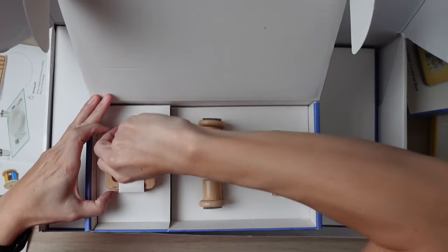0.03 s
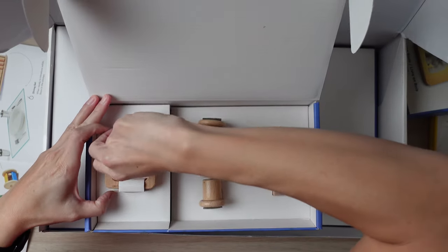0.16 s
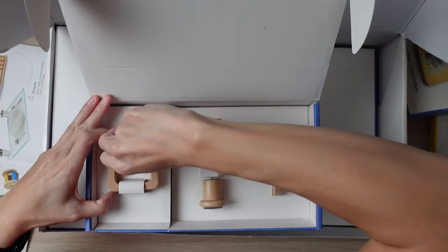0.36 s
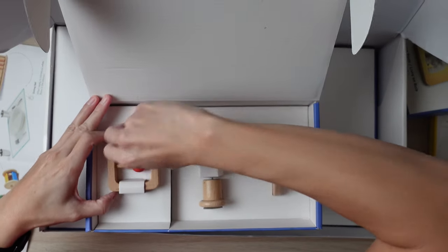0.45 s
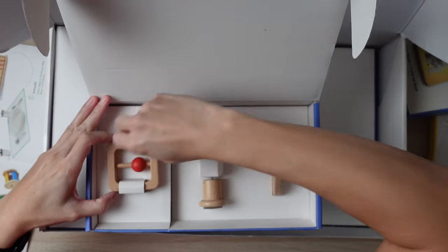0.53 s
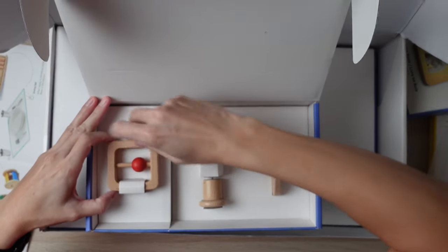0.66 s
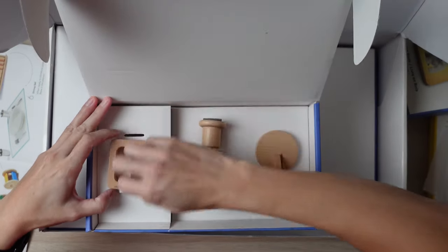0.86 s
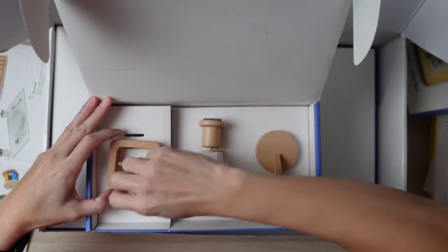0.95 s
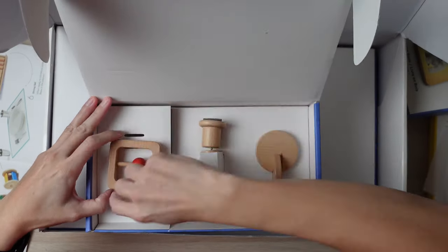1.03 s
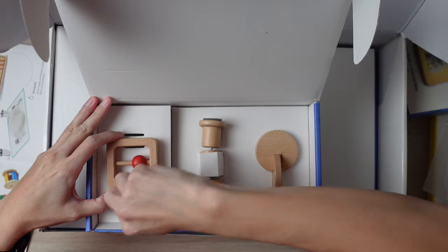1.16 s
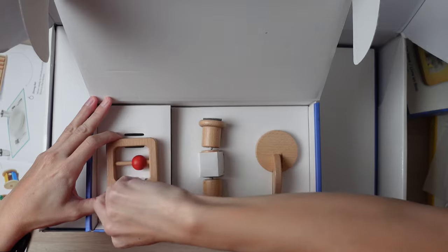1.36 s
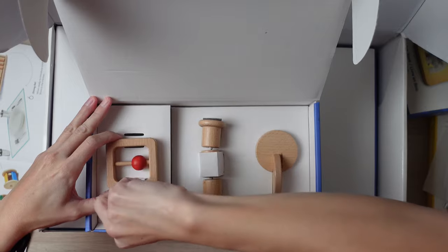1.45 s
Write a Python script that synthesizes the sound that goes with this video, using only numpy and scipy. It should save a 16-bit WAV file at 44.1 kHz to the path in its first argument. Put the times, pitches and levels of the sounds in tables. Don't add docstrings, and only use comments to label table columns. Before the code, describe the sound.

Wood-on-card clatter as a small toy jerks loose in its box, followed by light knocks and finger rustle

```python
import sys
import numpy as np
from scipy import signal
from scipy.fft import rfft, irfft
from scipy.io import wavfile

SR = 44100
rng = np.random.default_rng(int(sys.argv[2]) if len(sys.argv) > 2 else 0)


def output_pcm(signal):
    pcm = np.clip(np.atleast_2d(signal).T, -1, 1) * 32767
    wavfile.write(sys.argv[1], SR, np.round(pcm).astype(np.int16))


def ratio(d):
    e = np.asarray(d, float) / 20
    return 10 ** e


N = 66150

# f/Hz, density/dB
FLOOR_COLOUR = [(50, -38), (90, 0), (220, -17.5), (800, -28.5), (2100, -21), (4000, -15.5), (9000, -29.5),
                (16000, -31)]
# f/Hz, level/dB, t60/s
TABLE_MODES = [
    (29.9, 3, 0.73),
    (39, -12.5, 0.23),
    (54, 1, 0.57),
    (88, -36.5, .1),
]
# t/s, level/dB, contact/ms
SHOVES = [
    (0.263, -18.5, 7.1),
    (0.287, -14.5, 4.1),
    (0.303, -18.5, 11.5),
    (0.346, -20.5, 11.2),
]
# t/s, level/dB
HAND_LEVEL = [(0, -42.5), (.12, -35), (.2, -42.5), (.31, -21), (.45, -41), (.56, -43.5), (.63, -35),
              (.69, -43), (.74, -34), (.8, -44.5), (.86, -40), (.91, -48.5), (1.1, -49.5), (1.22, -37.5),
              (1.3, -47.5), (1.5, -40.5)]
# t/s, level/dB
CREAK_LEVEL = [(0, -44.5), (.15, -47.5), (.47, -48.5), (.56, -46.5), (.65, -58), (.76, -45.5), (.84, -59.5),
               (1.08, -63), (1.17, -50.5), (1.33, -52), (1.41, -53), (1.5, -47.5)]
# f/Hz, density/dB
CREAK_COLOUR = [(59, -25), (100, -5.5), (193, -15), (1190, -17.5), (2060, -28.5), (4130, -31.5),
                (8000, -78), (10400, -54), (17600, -120)]
# t/s, length/s, level/dB, hollow f/Hz, brightness/dB
RUBS = [(0, 0.0052, -40.5, 5480, -9), (0.385, 0.078, -50, 7700, -6), (0.488, 0.031, -51.5, 4840, 1),
        (0.545, 0.047, -47.5, 8700, 3), (0.586, 0.061, -51.5, 7500, 7), (0.65, 0.087, -45, 8100, 6.5),
        (0.716, 0.015, -41, 5330, -3), (0.723, 0.062, -48.5, 5400, -2), (0.774, 0.11, -52.5, 8150, -20),
        (0.827, 0.081, -47.5, 6480, 5), (0.903, 0.13, -44.5, 5040, 4.5), (0.97, 0.023, -35, 5580, 1),
        (1.042, 0.054, -65, 3390, 1.5), (1.074, 0.18, -57.5, 4600, -11), (0.96, 0.033, -40, 2600, -8.5),
        (0.999, 0.02, -57, 5200, 8.5), (1.03, 0.055, -50, 2400, -1), (1.104, 0.0083, -63, 12000, 17),
        (1.2, 0.0048, -67, 10200, 23), (1.358, 0.0038, -60, 7530, 11), (1.363, 0.0064, -48, 7560, -13),
        (1.465, 0.015, -56, 4250, 4), (1.24, 0.093, -78.5, 3900, -15)]
# f/Hz, density/dB
RUB_COLOUR = [(1200, -32.5), (2800, -22.5), (3300, -22.5), (5600, -1), (9000, -16), (13000, -25.5),
              (16000, -7.5)]
# f/Hz, width/Hz, level/dB
RUB_PEAKS = [(3540, 590, -6.5), (4730, 2000, -8.5), (13240, 480, -15)]
# t/s, level/dB
RASP_LEVEL = [(.155, -57), (.18, -29.5), (.205, -37.5), (.225, -20), (.27, -16), (.3, -31.5), (.35, -36),
              (.42, -57), (.5, -76)]
# f/Hz, density/dB
RASP_COLOUR = [(100, -10), (330, -2.5), (650, -0.5), (1000, -2.5), (1600, 0), (4000, -10), (8700, -25.5),
               (16000, -38)]
# f/Hz, level/dB, t60/s
BOX_MODES = [(142.4, 0.5, 0.11), (181, -2, 0.039), (322, -10, 0.059), (373, -6, 0.094), (592, 4, 0.039),
             (701, 0, 0.051), (900.3, -3.5, 0.067), (1133, 9.5, 0.015), (1302, -2, 0.041), (1590, 3, 0.022),
             (1922, -0.5, 0.039), (2500, 2.5, 0.0045), (3290, -1, 0.038), (4660, -6, 0.01)]
# t/s, peak/dB, ring centre f/Hz,
# crack/dB, contact/ms
TAPS = [(.018, -35.5, 1590, -7.5, 0.33), (.066, -28, 550, -4, 0.88), (.111, -27.5, 1710, -14, 3.2),
        (.119, -37, 1000, -5, 0.74), (.321, -24.5, 574, -20, 0.6), (.329, -25.5, 944, -11, 0.89),
        (.345, -35.5, 1390, -17, 1.5), (.355, -18, 1594, -18, .6), (.36, -21.5, 1026, -7.5, 0.81),
        (.364, -18, 543, -23.5, 0.61), (.373, -42, 910, -24, 0.4), (.381, -32, 630, -28, 3.2),
        (.4025, -27, 1070, -8, 0.22), (.407, -29.5, 430, -15, 1.2), (.5152, -14.5, 1122, -17.5, 0.4),
        (.519, -28.5, 442, -11.5, 2.8), (.528, -47, 915, -12, 4.2), (.5968, -25.5, 860, -30, 0.1),
        (.6, -28, 369, -35, 0.71), (.6035, -34.5, 620, -28, 1.2), (.693, -35, 640, -18, 0.18),
        (.72, -30, 3530, -11, 0.73), (.771, -35, 947, -8, 10.7), (1.1205, -20, 933, -15, 0.79),
        (1.123, -24, 378, -40, 3.7), (1.139, -30, 857, -19, 4.2), (1.301, -39.5, 426, -33, 17),
        (1.308, -40, 1120, -17, 1.6), (1.3548, -38.5, 2500, -17.5, 0.67), (1.3565, -40, 3870, -2.5, 0.76),
        (1.434, -42, 815, -11.5, 6.3), (.4685, -37, 600, -11, 0.73), (.481, -45, 833, -29, 1.2),
        (1.1208, -34.5, 1984, 4, 0.13), (1.143, -32.5, 1470, -7.5, 1.9), (.5972, -30.5, 1390, -10, 0.16),
        (.366, -22.5, 376.5, -24, 2.7), (.268, -21, 162, -38, 3.6), (.362, -32.5, 151, -40, 3.8),
        (1.151, -41, 1040, -10, 4.6)]
# f/Hz, density/dB
TAP_CRACK_COLOUR = [(400, -26.5), (900, -7.5), (1700, 1.5), (3000, -0.5), (5000, -8.5), (9000, -21),
                    (16000, -41.5)]
# t/s, peak/dB, ring centre f/Hz, crack/dB, contact/ms
CLACKS = [(.168, -23.5, 2060, -12.5, 3.4), (.173, -16.5, 1054, -14.5, 1.1), (.181, -24, 990, -22.5, 1.2),
          (.1905, -14.5, 1690, -27.5, 1), (.2, -24.5, 2050, -18, 1.4), (.2104, -15, 1500, -14.5, 1.4),
          (.2128, 1.7, 1026, -15.5, 2.14), (.2145, -12, 666, -38, 1.3), (.219, -7, 1030, -31.5, 0.41),
          (.223, -24, 945, -33, 1.4), (.228, -19.5, 1960, -11.5, 1.1), (.232, -7.5, 1565, -35.5, 0.78),
          (.2360, -2.5, 1490, -5.5, 0.3), (.239, -15, 1085, -2.5, 0.45), (.2443, -16, 2030, -5.5, 0.11),
          (.2487, -9.5, 1114, -37.5, 0.11), (.2550, -8, 890, -21, 0.13), (.259, -18, 1590, -1, 1.8),
          (.2659, -7, 1070, -6, 0.18), (.271, -20, 1260, -14, 1.6), (.2753, -9.5, 1020, -29, 0.54),
          (.2785, -12, 720, -31, 0.2), (.285, -26, 2820, -9, 1.1), (.291, -25.5, 1110, -13, 1.3),
          (.301, -20.5, 840, -22, 1.4), (.307, -28, 1246, -22, 0.65)]
# f/Hz, density/dB
CLACK_CRACK_COLOUR = [(700, -29.5), (1500, -9), (2500, -4.5), (4900, -3.5), (6800, -12.5), (8700, -8.5),
                      (10500, -21.5), (16000, -27)]

FLOOR_DB = -61
ROOM_T60_S, ROOM_DB, ROOM_CUT_HZ = 0.16, -19, 5000
RUB_EDGE_S, RUB_GRAINS_PER_S, RUB_ROUGH_DB, RUB_FLICKER_DB = 0.025, 5200, 1.6, 0.5
HOLLOW_DB, HOLLOW_CYCLES = -6, 20
RASP_SLIPS_PER_S, RASP_ROUGH_DB = 2900, 1.9
RING_OCTAVES, RING_SPREAD_DB, RING_DB = 0.82, 8, -11.5
CRACK_T60_S, CRACK_DB = 0.017, -2
JUDDER_PER_MS, BODY_CUT_HZ = 0.99, 140


def rms_one(x):
    return x / np.sqrt(np.mean(x ** 2) + 1e-20)


def in_time(rows):
    s, *columns = np.transpose(rows)
    return [np.interp(np.arange(N) / SR, s, c) for c in columns]


def colour(x, points):
    hz, db = np.transpose(points)
    grid_hz = np.arange(1025) * SR / 2048
    log_gain = np.interp(np.log(grid_hz + 1), np.log(hz), db / 20 * np.log(10))
    cepstrum = irfft(log_gain)
    cepstrum[1:1024] *= 2
    cepstrum[1025:] = 0
    impulse = irfft(np.exp(rfft(cepstrum)))[:1024]
    return signal.fftconvolve(x, impulse)[:len(x)]


def drift(rate_hz):
    r = np.exp(-2 * np.pi * rate_hz / SR)
    wander = signal.lfilter([1], [1, -2 * r, r * r], rng.standard_normal(N + 9000))
    return rms_one(wander[9000:])


def ring(x, hz, t60_s):
    r, w = ratio(-60 / (t60_s * SR)), 2 * np.pi * hz / SR
    return signal.lfilter([0, np.sin(w)], [1, -2 * r * np.cos(w), r * r], x + 1e-18)


def grains(per_s, rough_db):
    clicks = rng.random(N) < per_s / SR
    size = ratio(rough_db * np.minimum(rng.exponential(1, N), 4))
    return rms_one(clicks * size * rng.choice([-1, 1], N))


def floor():
    return ratio(FLOOR_DB) * rms_one(colour(rng.standard_normal(N), FLOOR_COLOUR))


def room(x):
    t = np.arange(SR // 2) / SR
    tail = rng.standard_normal(len(t)) * ratio(-60 * t / ROOM_T60_S) * np.clip(t / 0.0011, 0, 1)
    tail = signal.sosfilt(signal.butter(1, ROOM_CUT_HZ, fs=SR, output="sos"), tail)
    return signal.fftconvolve(x, tail / np.sqrt(np.sum(tail ** 2)))[:N]


def table():
    force, t = np.zeros(N), np.arange(N) / SR
    for s, db, contact_ms in SHOVES:
        push = np.clip(1 - ((t - s) * 1000 / contact_ms - 1) ** 2, 0, 1) ** 2
        force += ratio(db) * push / push.sum()
    wobble = sum(ratio(db) * ring(force, hz, t60_s) for hz, db, t60_s in TABLE_MODES)
    hands_db, = in_time(HAND_LEVEL)
    noise = rng.standard_normal((2, N + SR))
    upper = rms_one(ring(ring(noise[0], 71.0, 0.11), 55.8, 0.17)[SR:])
    lower = rms_one(ring(ring(noise[1], 26, 0.15), 33, 0.34)[SR:])
    return wobble + ratio(hands_db) * (upper + ratio(-3.5) * lower)


def card_creak():
    creak = rms_one(colour(grains(3000, 1.2), CREAK_COLOUR))
    return ratio(in_time(CREAK_LEVEL)[0] + 2.0 * drift(21)) * creak


def finger_rubs():
    hiss = rms_one(colour(grains(RUB_GRAINS_PER_S, RUB_ROUGH_DB), RUB_COLOUR))
    peaks = sum(ratio(db) * rms_one(ring(hiss, hz, 2.2 / width_hz)) for hz, width_hz, db in RUB_PEAKS)
    hiss = rms_one(hiss + peaks)
    low = signal.sosfilt(signal.butter(4, 9000, "low", fs=SR, output="sos"), hiss)
    high = signal.sosfilt(signal.butter(4, 9000, "high", fs=SR, output="sos"), hiss)
    t, out = np.arange(N) / SR, 0
    for s, length_s, db, hz, bright_db in RUBS:
        to_edge_s = np.minimum(t - s, s + length_s - t)
        stroke = np.clip(to_edge_s / min(RUB_EDGE_S, length_s / 2), 0, 1)
        hollow = ratio(HOLLOW_DB) * rms_one(ring(hiss, hz, HOLLOW_CYCLES / hz))
        out = out + stroke * ratio(db) * (low + ratio(bright_db) * high + hollow)
    return out * ratio(RUB_FLICKER_DB * (drift(46.3) + drift(14.0)))


def rasp():
    slips = rms_one(colour(grains(RASP_SLIPS_PER_S, RASP_ROUGH_DB), RASP_COLOUR))
    rung = rms_one(sum(ring(slips, hz, 0.34 * t60_s) * ratio(db) / np.sqrt(t60_s)
                       for hz, db, t60_s in BOX_MODES))
    t = np.arange(N) / SR
    fade_in = np.clip((t - RASP_LEVEL[0][0]) / 0.013, 0, 1)
    fade_out = np.clip((RASP_LEVEL[-1][0] - t) / 0.071, 0, 1)
    level = ratio(in_time(RASP_LEVEL)[0] + 2.0 * drift(52))
    return level * fade_in * fade_out * rms_one(slips + 0.2 * rung)


def knocks(rows, crack_colour, cycles):
    body, crack, t = np.zeros(N + SR), np.zeros(N + SR), np.arange(6000) / SR
    hz, mode_db, t60_s = np.transpose(BOX_MODES)[:, :, None]
    sign = (-1) ** np.arange(len(hz))[:, None]
    for s, db, centre_hz, crack_db, contact_ms in rows:
        chance, i = rng.standard_normal((3, 6000)), int(s * SR)
        away = np.abs(np.log2(hz / centre_hz) / RING_OCTAVES) ** 0.72
        weight_db = RING_DB + mode_db - 9 * away + RING_SPREAD_DB * chance[0, :len(hz), None]
        modes = (ratio(weight_db - 60 * t / t60_s) * sign * np.sin(2 * np.pi * hz * t)).sum(axis=0)
        thock_decay = ratio(-60 * t * np.sqrt(1000 * centre_hz) / cycles)
        modes += thock_decay * np.sin(2 * np.pi * centre_hz * t)
        contact = t * 1000 / max(contact_ms, 0.05)
        press = contact * np.exp(1 - contact)
        rough = JUDDER_PER_MS * contact_ms * chance[1] * np.abs(chance[1])
        judder = np.cos(2 * np.pi * centre_hz * t) + rough
        hit = signal.fftconvolve(modes, press ** 2 * judder)[:len(t)]
        body[i:i + len(t)] += ratio(db) * hit / np.abs(hit).max()
        snap = signal.fftconvolve(press ** 4, ratio(-60 * t / CRACK_T60_S))[:len(t)]
        crack[i:i + len(t)] += ratio(db + crack_db + CRACK_DB) * chance[2] * snap / snap.max()
    colour_gain = np.std(colour(rng.standard_normal(N), crack_colour))
    crack = colour(crack[:N], crack_colour) / colour_gain
    high_pass = signal.butter(1, BODY_CUT_HZ, "high", fs=SR, output="sos")
    return signal.sosfilt(high_pass, body[:N]) + crack


def scene():
    clacks = knocks(CLACKS, CLACK_CRACK_COLOUR, cycles=15.4)
    taps = knocks(TAPS, TAP_CRACK_COLOUR, cycles=16.8)
    near = clacks + taps + rasp() + finger_rubs()
    mix = near + ratio(ROOM_DB) * room(near) + card_creak() + floor() + table()
    return mix[None]


def band_limit(x):
    return signal.sosfilt(signal.butter(12, 16550, fs=SR, output="sos"), x)


def record(dry):
    top_cut = signal.cheby2(12, 60, 16250, fs=SR, output="sos")
    mix = np.clip(signal.sosfilt(top_cut, dry), -1, 1)
    return band_limit(mix)


dry = scene()
out = record(dry)
output_pcm(out)
```